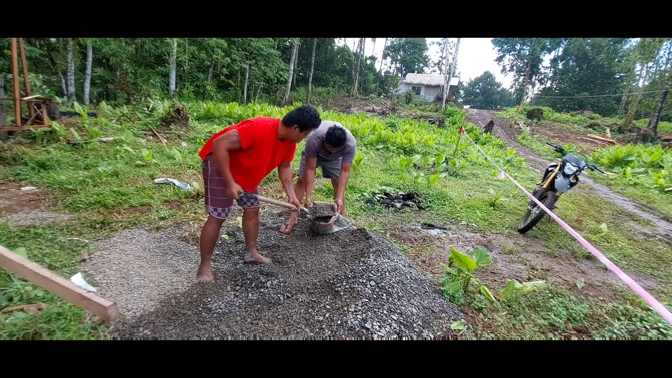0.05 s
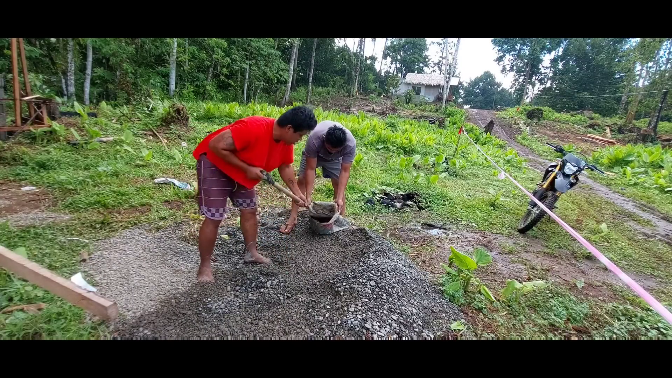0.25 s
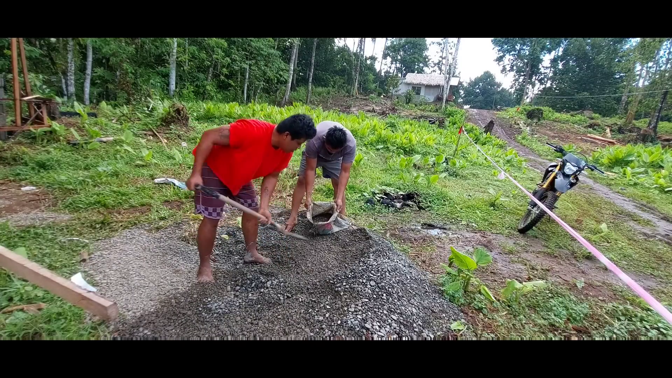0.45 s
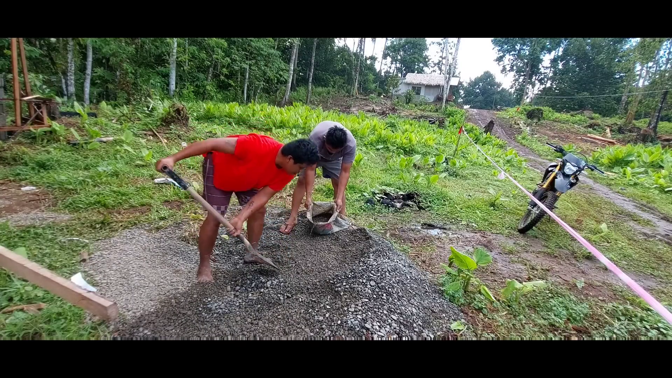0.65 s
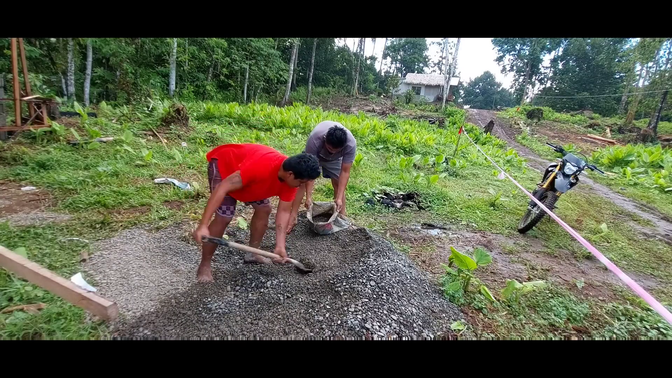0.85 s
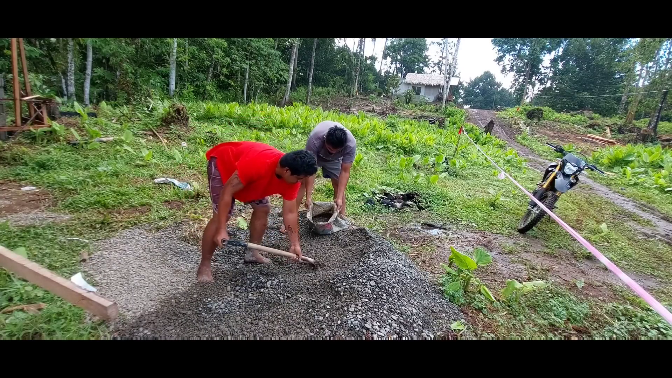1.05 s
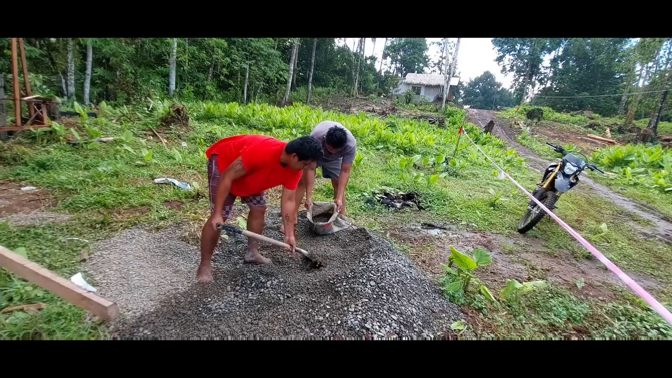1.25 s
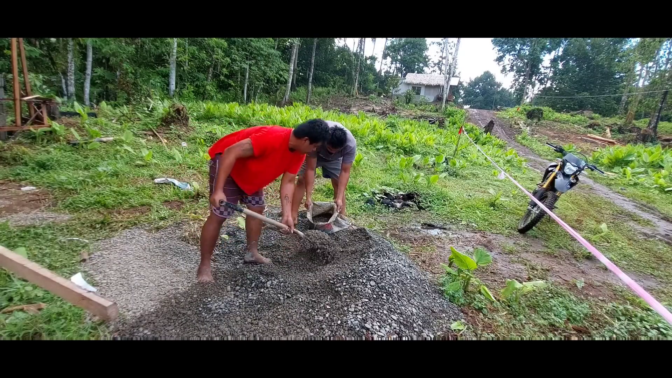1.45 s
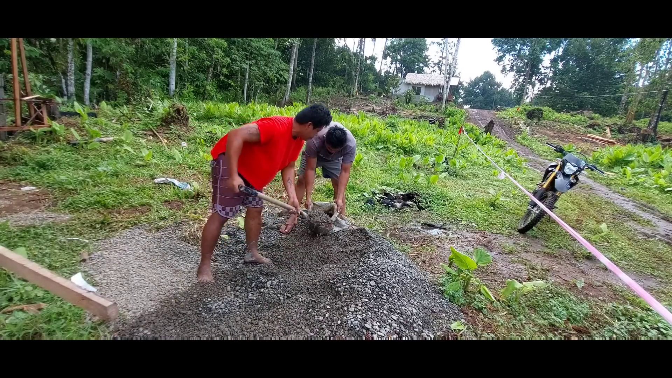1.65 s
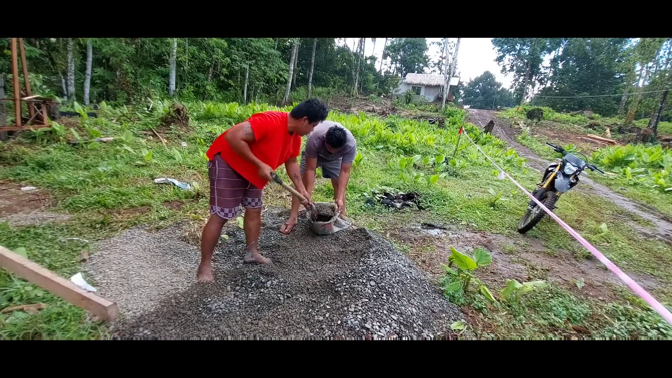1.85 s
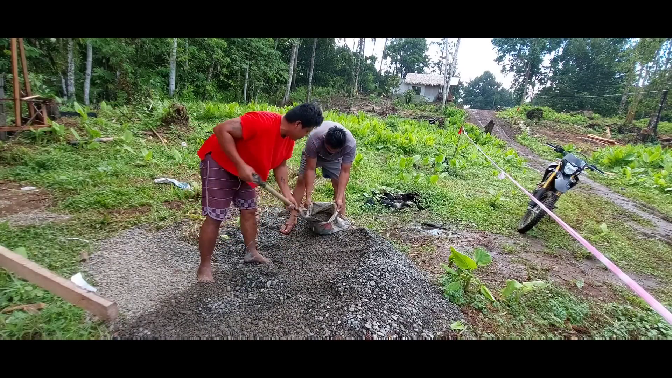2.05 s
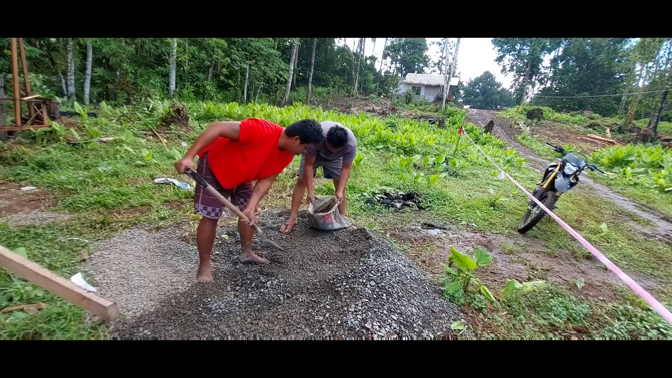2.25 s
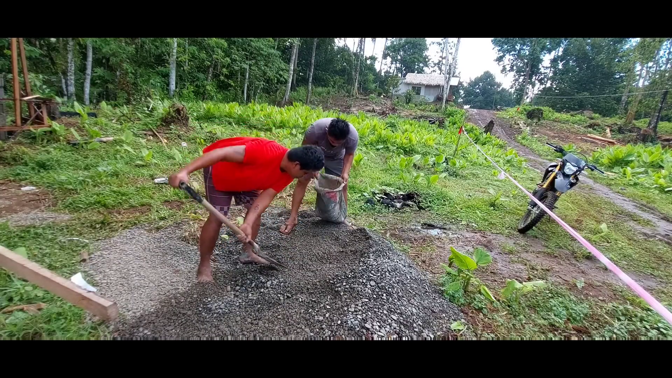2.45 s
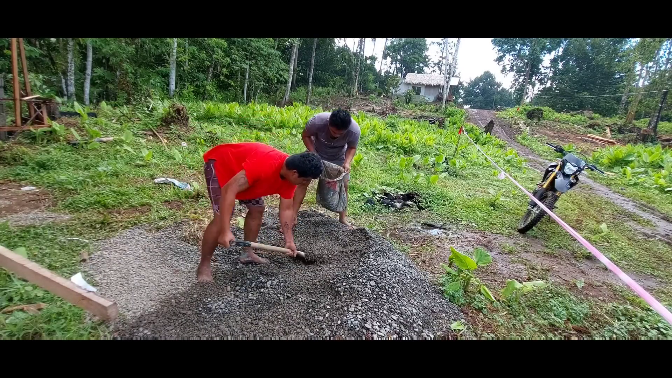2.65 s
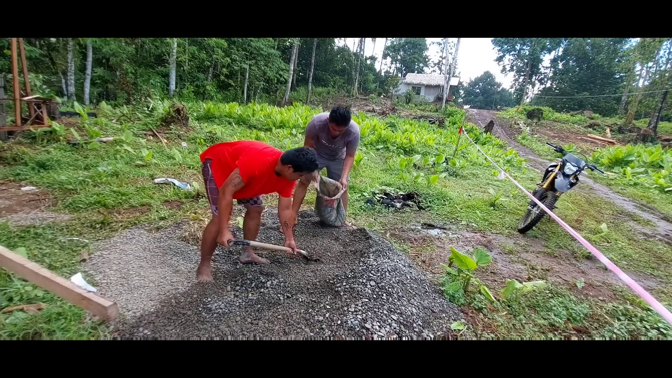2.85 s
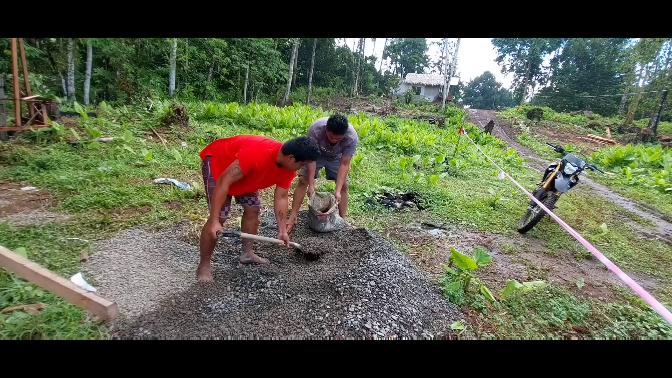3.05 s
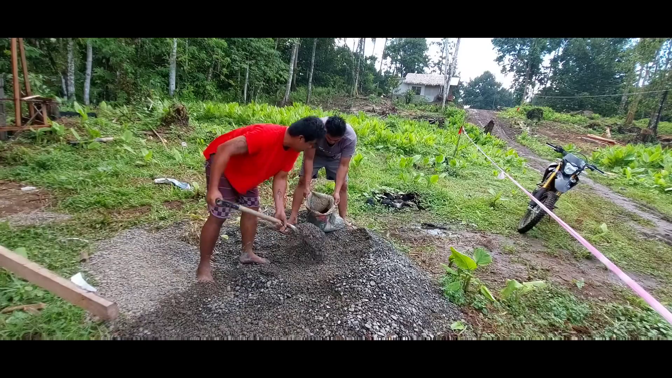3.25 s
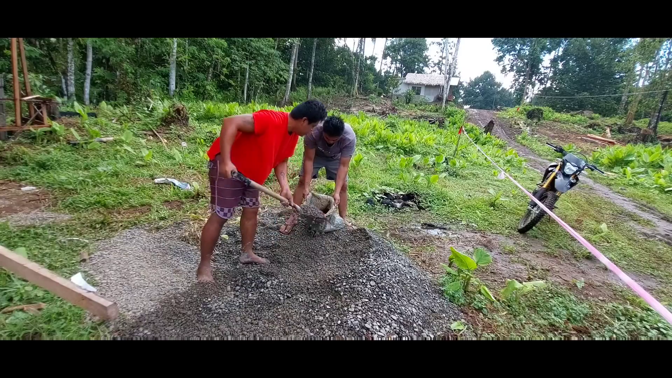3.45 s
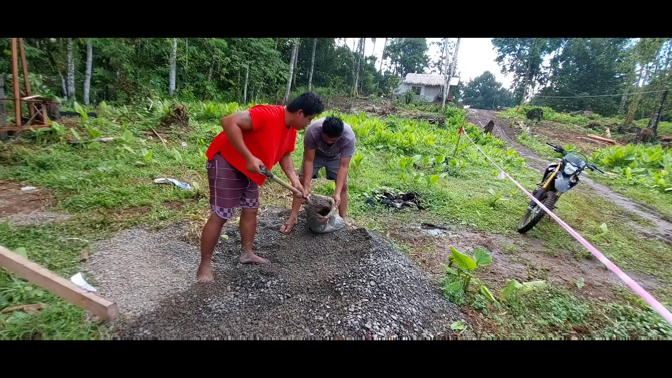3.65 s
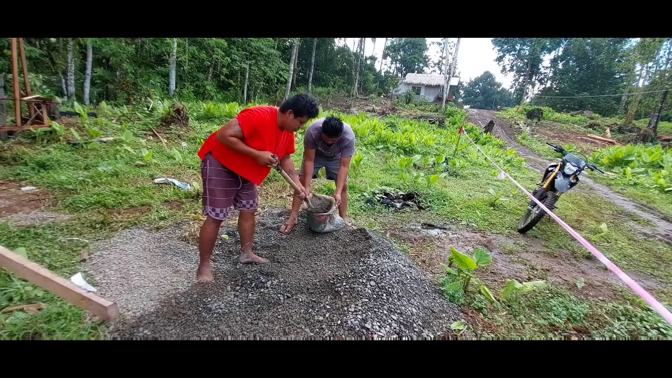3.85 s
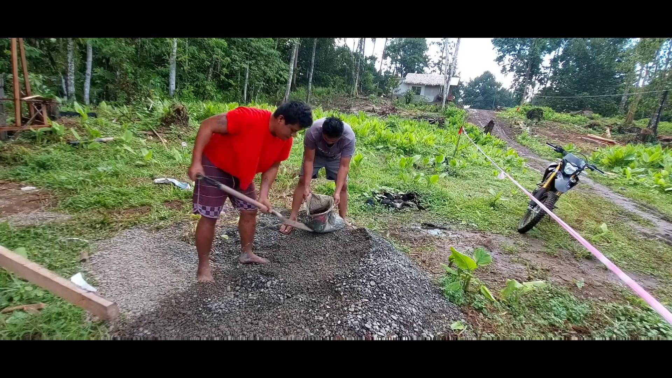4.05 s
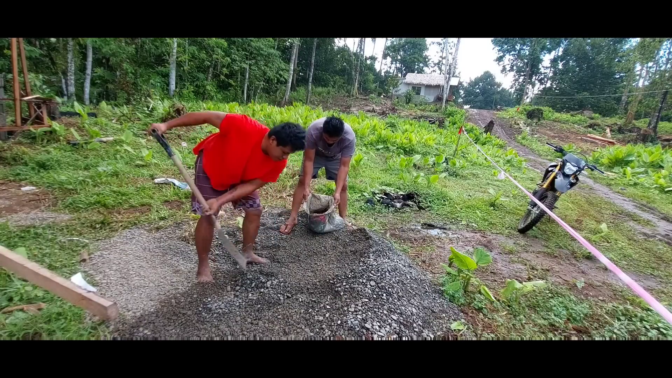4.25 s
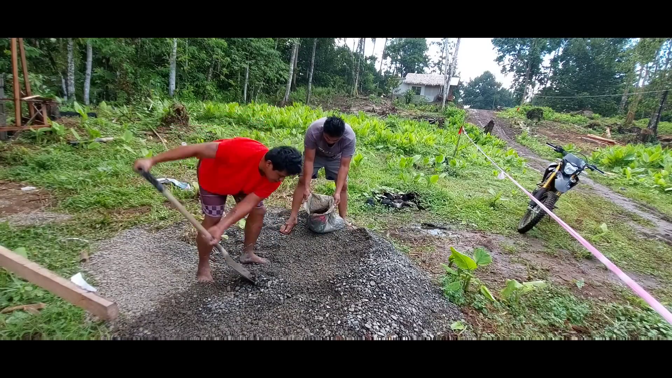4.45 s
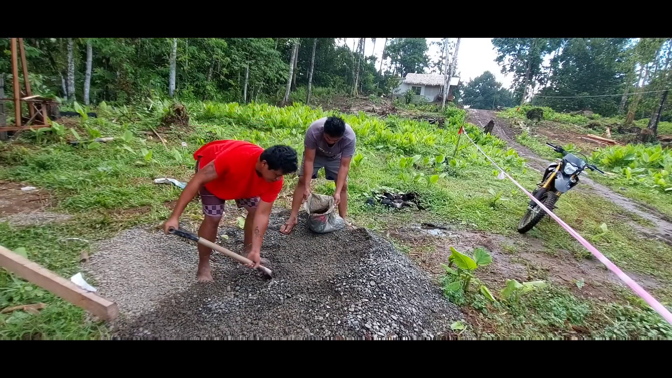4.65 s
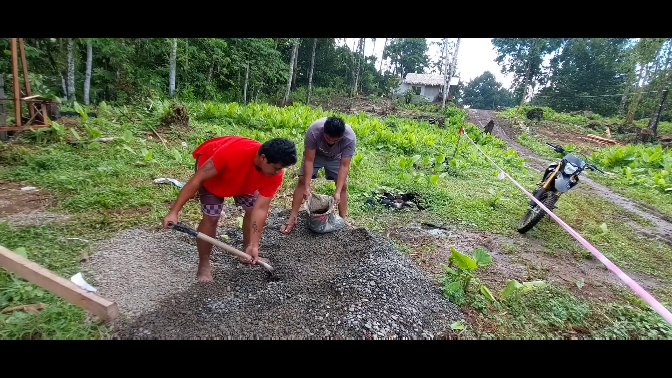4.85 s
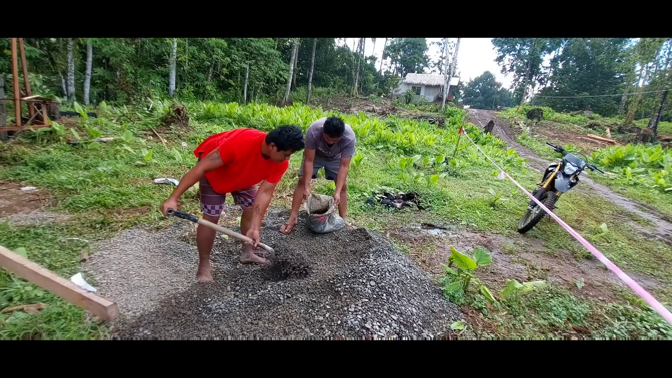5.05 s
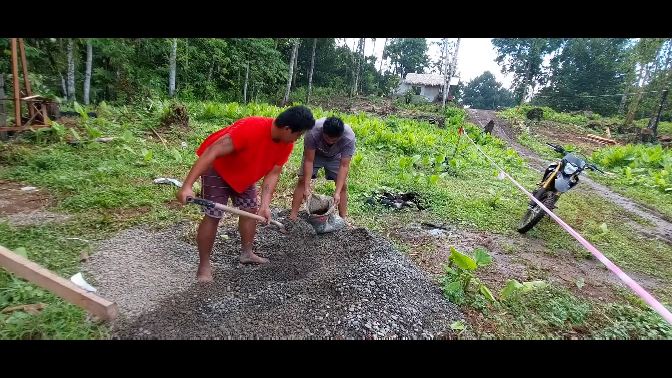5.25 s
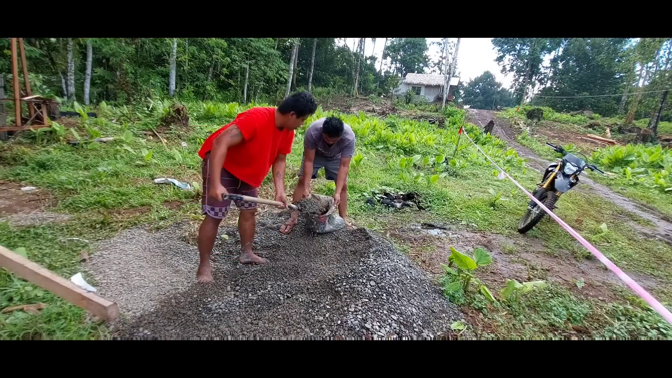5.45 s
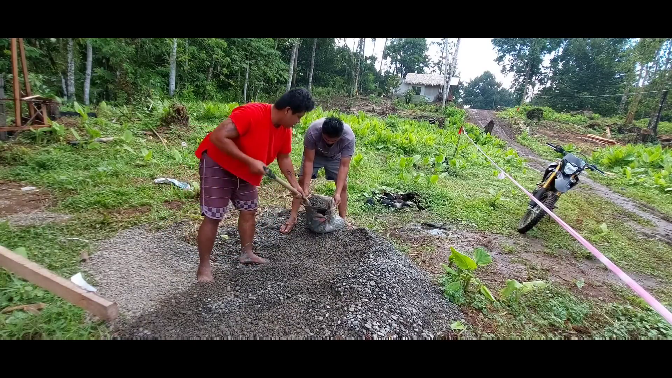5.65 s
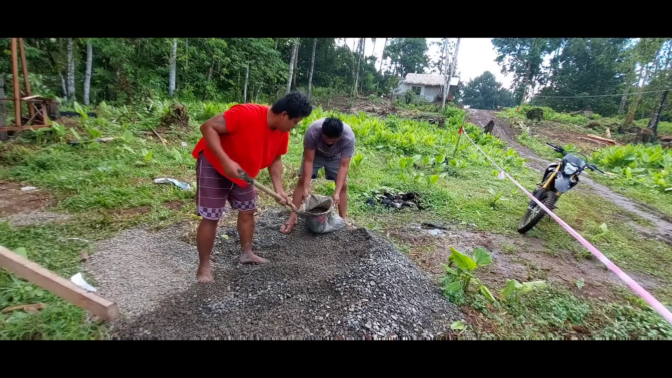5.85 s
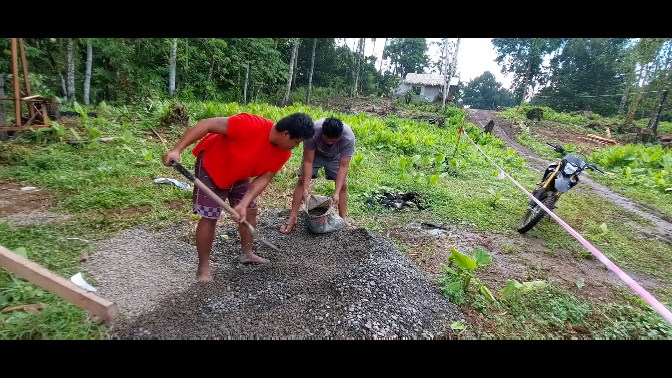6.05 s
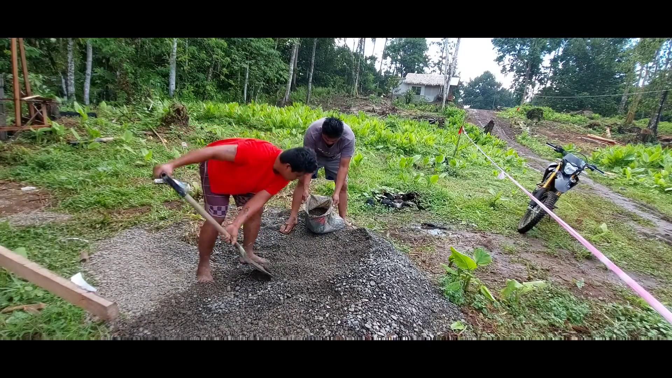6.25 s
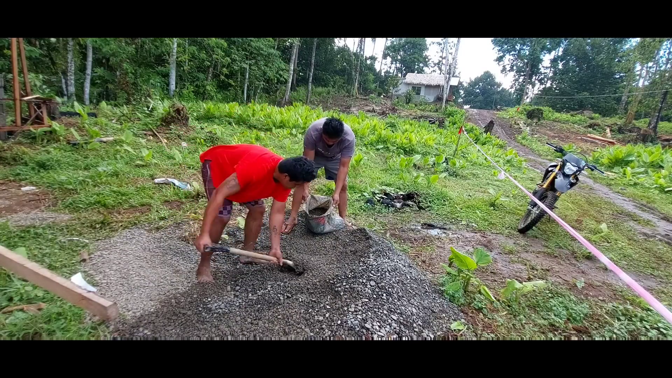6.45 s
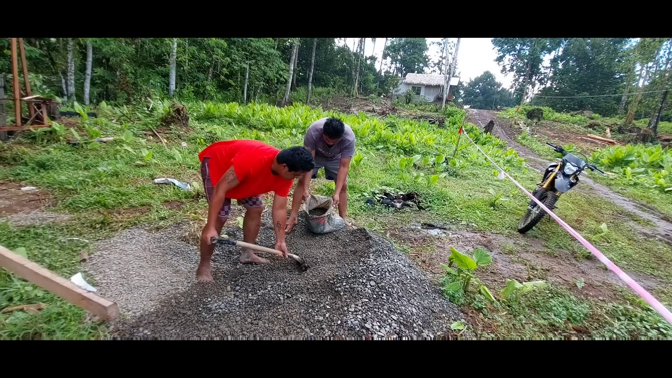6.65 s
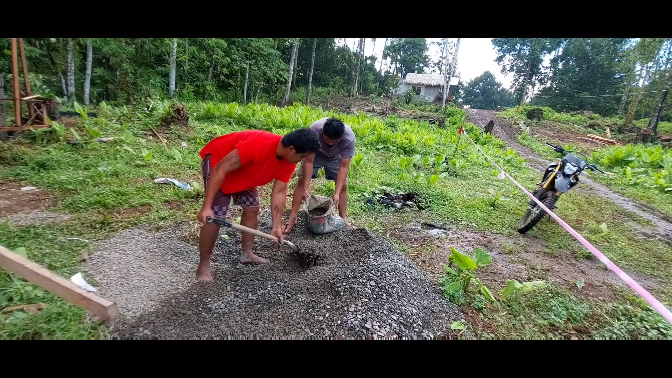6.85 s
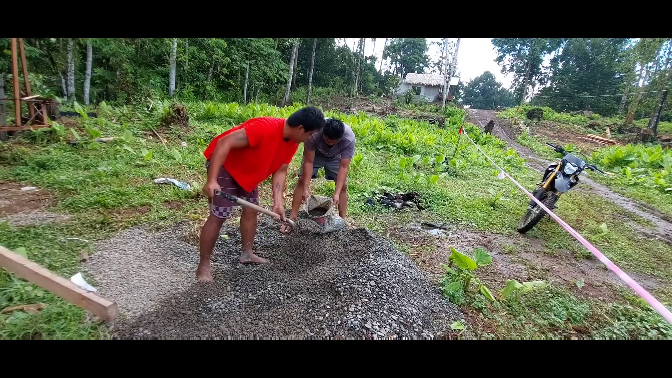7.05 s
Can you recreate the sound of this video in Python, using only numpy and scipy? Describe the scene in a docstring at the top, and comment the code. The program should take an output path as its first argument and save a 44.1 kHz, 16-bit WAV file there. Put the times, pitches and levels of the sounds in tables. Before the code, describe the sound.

A shovel works a heap of gravel, sand and cement in the foreground of an open garden. A load swishes down at about 0.3 seconds. The blade then crunches in at 0.9, 2.6, 4.5 and 6.4 seconds; these bites are the loudest sounds, and the last three carry sharp clicks of stone on steel. After each, pebbles trickle and tick quietly as the blade lifts. Further loads slide off with a softer, gritty swish at about 2, 3.9 and 5.8 seconds. Damp sand lands with a dull thud near 2.6 and 3.1 seconds, and faint hollow bumps fall between strokes. Throughout, a distant engine hums low, easing slightly, under a steady high insect hiss. Small birds give faint falling whistles at the start and scattered chirps later, with two far hoots after 6 seconds. Pebbles are still trickling at the end, around 7 seconds.

```python
"""A garden, where a shovel turns a heap of gravel, sand and cement. Four times the blade crunches in;
pebbles trickle and knock as it lifts, and loads swish down onto the heap. Damp sand lands twice with
a dull thud. All the gravel is built from tiny ringing collisions, shaped in three bands: low soil,
mid crunch and high grit. Behind the work a far engine hums, insects hiss and a few small birds call."""
import sys
import numpy as np
from scipy import signal
from scipy.fft import rfft, irfft, next_fast_len
from scipy.io import wavfile
from scipy.ndimage import map_coordinates

SR = 44100
rng = np.random.default_rng(int(sys.argv[2]) if len(sys.argv) > 2 else 0)


def unload_wav(signal):
    """Save mono or channel-first audio to the path in sys.argv[1] as 16-bit WAV at rate SR, clipped to [-1, 1]."""
    wavfile.write(
        sys.argv[1],
        SR,
        np.round(np.clip(np.atleast_2d(signal).T, -1, 1) * 32767).astype(np.int16),
    )


N = 313551

# stereo image, tight in the bass and wide in the treble: f/Hz, left-right coherence/0..1
STEREO_COHERENCE = [(100, .99), (400, .97), (700, .94), (1500, .78), (3000, .6), (6000, .55), (10000, .4),
                    (15000, .35)]
# how far the left channel leads: f/Hz, phase/rad
STEREO_LEAD = [(100, 0), (500, .03), (1300, .55), (3000, .7), (4400, 1.5), (5800, .6), (8000, 1.2),
               (12000, 1.6), (15000, 1.6)]
# balance across the spectrum: f/Hz, left over right/dB
STEREO_PAN = [(60, 7), (110, 2), (200, 0.03), (380, 1.4), (700, -0.7), (1290, 0.3), (2380, -0.2), (4400, 2),
              (8120, 0), (15000, -3.5)]

# EQ of the still garden air: f/Hz, gain/dB
AIR_EQ = [(22, -10), (49, 3.5), (75, -3.5), (125, -7), (200, -16), (500, -21), (1000, -33), (2500, -33),
          (4000, -30), (7000, -23), (9500, -36.5), (15500, -30)]
# insect choirs as peaks on the air, with one dip below them: f/Hz, width/Hz, gain/dB
INSECT_BANDS = [(3050, 340, -18), (4620, 510, 7), (5200, 770, 9), (8100, 870, 9), (11350, 1700, 21)]
# fader ride of the far engine, sinking with a few swells: t/s, relative level/dB
ENGINE_FADER = [(0.0, -47), (0.95, -46), (1.8, -51.5), (2.16, -48.5), (2.95, -52), (4.53, -53), (4.75, -49),
                (5.54, -54.5), (5.8, -54.5), (6.63, -48.5), (7.11, -57)]
# firing rate of the engine: t/s, f/Hz
ENGINE_FIRING = [(0, 62.95), (1.5, 64.06), (7.11, 63.64)]
# one small bird's falling chirps: t/s, level/dB
BIRD_CHIRPS = [(0.629, -60), (0.70, -59), (1.15, -54), (1.76, -52), (1.835, -55), (3.235, -57),
               (5.127, -54), (5.205, -55), (6.315, -55)]
# longer gliding whistles: t/s, length/s, level/dB, first f/Hz, middle f/Hz, last f/Hz
BIRD_WHISTLES = [(0.115, 0.135, -49, 5700, 4750, 3850), (0.425, 0.145, -50, 5900, 5000, 3950),
                 (6.14, 0.17, -58.5, 3750, 4600, 4550)]
# far hoots, each on one pitch: t/s, length/s, level/dB, f/Hz
BIRD_HOOTS = [(6.13, 0.1, -56.5, 560), (6.81, 0.13, -62, 680)]

# soft hollow bumps between strokes: t/s, level/dB, f/Hz
SOFT_THUMPS = [(1.485, -53.5, 274), (3.822, -50, 201), (5.426, -59, 296)]
# stones hitting steel or each other: t/s, relative level/dB, f/Hz, left over right/dB, half-width/octaves
STONE_KNOCKS = [(0.0704, -23.5, 11800, -1, 2), (0.0953, -26.5, 2780, -3, 1.05),
                (0.8593, -23.5, 4700, 1, 0.67), (1.4228, -26.5, 3680, 0.5, 0.65),
                (1.6053, -29.5, 4590, 1, 0.84), (1.6895, -30, 11600, -4, 0.89), (1.762, -25, 2900, 0, 0.7),
                (1.8437, -26.5, 14200, -5, 2.6), (2.6425, -5, 1760, 5, 2.8), (2.6758, -10, 1920, -8, 0.4),
                (3.2091, -32, 2840, 0, 1.3), (3.4905, -30, 2830, 1, 0.81), (3.4366, -29, 12600, 2, 1.7),
                (3.6027, -28.5, 12900, -1, 1.7), (3.792, -21.5, 11400, 4, 1.2),
                (3.941, -17.5, 4600, -2, 0.53), (4.569, -6, 11000, 1, 0.56), (4.7002, -9, 2030, -1, 0.46),
                (5.121, -27.5, 2570, 4, 1), (5.2674, -29, 12000, -2, 0.9), (5.359, -24, 12800, -2, 0.8),
                (5.5153, -24, 12300, -1, 1.5), (5.6197, -25, 12700, 1, 2), (6.1352, -30.5, 13800, -5, 0.55),
                (6.2767, -33, 5050, -2, 0.94), (6.3493, -32, 4810, -2, 1.8), (6.374, -19, 12140, 4, 0.26),
                (6.5488, -8, 2800, 4, 1.7)]
# the loaded blade lifts and swings: t/s, length/s, opening pebble level/dB, closing grit level/dB
LIFT_CUES = [(-0.7, 0.82, -49.3, -51.5), (1.13, 0.8, -47.8, -49.5), (2.85, 0.98, -50.6, -49.4),
             (4.84, 0.89, -49.4, -48.2), (6.72, 0.85, -52, -51)]
# EQ of trickling pebbles: f/Hz, gain/dB
TRICKLE_EQ = [(88, -36), (150, 26), (189, -3), (279, 12.5), (428, -1.5), (656, -5.5), (1150, -7),
              (2450, -0.5), (8330, -6), (12500, -1), (15500, -1)]
# damp sand drops in a lump: t/s, rise/s, pour/s, thud delay/s, crunch level/dB, thud boost/dB
DUMP_CUES = [(2.315, 0.26, 0.045, 0.26, -37, 8.5), (2.971, 0.014, 0.064, 0.088, -37, 10)]
# EQ of damp sand: f/Hz, gain/dB
DUMP_EQ = [(53, -32), (90, -2), (288, -0.5), (415, -0.5), (515, -4), (1050, -15.5), (1720, -16),
           (2280, -19), (5280, -24), (15500, -30.5)]
# a load slides off and lands: t/s, rise/s, fall/s, crunch level/dB, grit offset/dB, soil offset/dB
THROW_CUES = [(0.242, 0.13, 0.06, -36.5, -3, -9.5), (1.92, 0.16, 0.065, -38, -3.5, -10.5),
              (3.842, 0.12, 0.065, -35.5, -4.8, -12.5), (5.712, 0.15, 0.055, -35.3, -3.5, -10.5)]
# EQ of the landing load: f/Hz, gain/dB
THROW_EQ = [(59, -37), (100, 8.5), (129, -7), (438, -4), (654, -6.5), (956, 2), (1110, -1), (1620, 5),
            (2000, 2.5), (5170, 0), (8410, -13.5), (12000, -10), (15500, -16)]
# the blade drives into the heap: t/s, rise/s, push/s, brake/s, crunch level at full depth/dB,
# crunch growth on the way in/dB, grit offset at first touch/dB, soil offset/dB
DIG_CUES = [(0.874, 0.027, 0.11, 0.12, -23.5, 0.5, 3, -9),
            (2.631, 0.0084, 0.076, 0.18, -23.2, -1, 2.5, -9.5),
            (4.549, 0.0095, 0.12, 0.18, -26, 4, 3, -7.5), (6.35, 0.12, 0.058, 0.18, -22.5, -5, 7, -12.5)]
# EQ of the bite: f/Hz, gain/dB
DIG_EQ = [(47, -56), (80, -3), (181, -17), (281, -9), (366, -11), (418, -8.5), (649, -6), (741, -4.5),
          (1150, -4), (2000, 0.5), (6860, -5.5), (8550, -12.5), (11900, -5.5), (15500, -12)]
# resonances of the blade, damped by the heap: f/Hz, width/Hz, gain/dB
BLADE_MODES = [(294, 32, 2), (756, 28, 4.5), (1390, 91, 2.5), (1670, 110, 0.5), (2020, 380, 1),
               (4800, 1300, 2.5)]


def amp(db):
    """Decibels to linear gain."""
    return 10 ** (np.asarray(db) / 20)


def normalise(x):
    """Scales a stereo pair so that its mono mix has rms 1."""
    return x / np.sqrt(np.mean(x.mean(0) ** 2) + 1e-20)


def curve(points, hz):
    """Joins breakpoints with straight lines on a log-frequency axis."""
    f, value = np.transpose(points)
    return np.interp(np.log(hz + 1), np.log(f + 1), value)


def bells(modes, hz):
    """The gain in dB of a set of bell filters."""
    return sum(db / (1 + (2 * (hz - f) / width) ** 2) for f, width, db in modes)


def add(mix, s, sound):
    """Drops a sound on the timeline at s seconds, trimming any overhang."""
    at = round(s * SR)
    sound = sound[:, max(-at, 0):]
    part = mix[:, max(at, 0):][:, :sound.shape[1]]
    part += sound[:, :part.shape[1]]


def wander(n, rate):
    """Smooth random modulator, rms near 1, that moves about `rate` times a second."""
    knots = rng.standard_normal(4096)
    return map_coordinates(knots, [np.arange(n) * rate / SR], order=2, mode="wrap")


def envelope(t, onset_db, rise_s, hold_s, fall_s, fall_bend=1, rise_bend=1):
    """Attack, hold and release in dB: climbs by onset_db, holds, and is 30 dB down after fall_s."""
    attack = np.maximum(1 - t / rise_s, 0)
    release = np.maximum(t - rise_s - hold_s, 0) / fall_s
    return -onset_db * attack ** rise_bend - 30 * release ** fall_bend


def stereo(spectra, hz):
    """Blends two unrelated spectra into one image: alike in the bass, apart in the treble."""
    same = np.clip(curve(STEREO_COHERENCE, hz), 0, 1)
    right = same * spectra[0] + np.sqrt(1 - same ** 2) * spectra[1]
    lag = np.exp(-1j * curve(STEREO_LEAD, hz))
    lean = amp(curve(STEREO_PAN, hz) / 2)
    return np.array([spectra[0] * lean, right * lag / lean])


def garden(level_db=-54, coherence=0.66):
    """The bed: a low rumble of open air and the steady hiss of insects from all sides."""
    size = next_fast_len(N, True)
    hz = np.fft.rfftfreq(size, 1 / SR)
    noise = rfft(rng.standard_normal((2, size)))
    same = np.clip(curve(STEREO_COHERENCE, hz) ** 2.7 * coherence, 0, 1)
    noise[1] = same * noise[0] + np.sqrt(1 - same ** 2) * noise[1]
    air = irfft(noise * amp(curve(AIR_EQ, hz) + bells(INSECT_BANDS, hz)), size)[:, :N]
    return normalise(air) * amp(level_db + 0.5 * wander(N, 4))


def engine(trim_db=5.0, octave_db=-19, waver=0.0135, throb_db=2.5):
    """A far engine: only the firing note and its octave carry, throbbing unevenly."""
    t = np.arange(N) / SR
    hz = np.interp(t, *np.transpose(ENGINE_FIRING)) * (1 + waver * wander(N, 9.8))
    phase = 2 * np.pi * np.cumsum(hz) / SR
    hum = np.sin(phase) + amp(octave_db + 2 * wander(N, 10)) * np.sin(2 * phase)
    return hum * amp(np.interp(t, *np.transpose(ENGINE_FADER)) + trim_db + throb_db * wander(N, 14))


def birds(chirp_s=0.045, chirp_hz=(3170, 3020, 2780), waver=0.012, flutter_db=1.5, wet_db=-5, tail_s=0.06):
    """Chirps, thin whistles and two far hoots: fluttering sine tones, blurred by the trees."""
    song = np.zeros((1, N))
    chirps = [(s, chirp_s, db, *chirp_hz) for s, db in BIRD_CHIRPS]
    for s, length_s, db, *pitches in [*chirps, *BIRD_WHISTLES, *BIRD_HOOTS]:
        n = int(length_s * SR)
        progress = np.linspace(0, 1, n)
        glide = np.polyfit(np.linspace(0, 1, len(pitches)), pitches, len(pitches) - 1)
        hz = np.polyval(glide, progress) * (1 + waver * wander(n, 335))
        level = amp(db + flutter_db * wander(n, 80)) * np.sin(np.pi * progress)
        add(song, s, (level * np.sin(2 * np.pi * np.cumsum(hz) / SR))[None])
    t = np.arange(SR // 3) / SR
    trees = rng.standard_normal((2, len(t))) * np.exp(-t / tail_s)
    reverb = signal.oaconvolve(song, trees / np.linalg.norm(trees[0]), axes=1)[:, :N]
    return song + amp(wet_db) * reverb


def thumps(swell_s=0.0082):
    """Each soft bump is one low, quickly damped note."""
    out, t = np.zeros((2, N)), np.arange(SR // 8) / SR
    swell = t / swell_s * np.exp(1 - t / swell_s)
    for s, db, hz in SOFT_THUMPS:
        add(out, s, (amp(db) * swell * np.sin(2 * np.pi * hz * t))[None])
    return out


def chips(per_lift=2, relative_db=-36, spread_db=7, hz=11500, octaves=1.6, earliest=0.58):
    """Extra knock cues: small chips tick off the blade at random, late in each lift."""
    cues = []
    for s, length_s, _, _ in LIFT_CUES:
        for when, strength, side in rng.random((per_lift, 3)):
            at_s = s + length_s * (earliest + (1 - earliest) * when)
            cues.append((at_s, relative_db + spread_db * (2 * strength - 1), hz, -4 * side, octaves))
    return cues


def knocks(trim_db=9, ring_s=0.00091, rattle_db=-27, rattle_s=0.032, size=1024):
    """A stone gives one dry snap around its own pitch and a brief rattle of its neighbours."""
    out, t, hz = np.zeros((2, N)), np.arange(size) / SR, np.fft.rfftfreq(size, 1 / SR)
    decay = np.exp(-t / ring_s) + amp(rattle_db) * np.exp(-t / rattle_s)
    preroll = size // 8  # room for the filter to ring ahead of the hit
    for s, db, pitch, pan_db, octaves in [*STONE_KNOCKS, *chips()]:
        snap = rng.choice([-1., 1.], (2, size)) * decay
        body = 1 / (1 + (np.log2((hz + 1) / pitch) / octaves) ** 6)
        click = irfft(stereo(rfft(np.roll(snap, preroll, 1)), hz) * body)
        click /= np.linalg.norm(click.mean(0))
        add(out, s - preroll / SR, click * amp(db + trim_db + np.array([[pan_db], [-pan_db]]) / 2))
    return out


def grains(n, density, spread_db, cycles, bands=24):
    """Stones of many sizes collide at random and ring briefly; the small, bright ones hit most often."""
    out = np.zeros((2, n))
    for hz in np.geomspace(120, 17000, bands):
        hits_per_s = density / bands * np.sqrt(hz / 3000)
        chance = rng.random(n) / (hits_per_s / SR)
        hits, force = chance < 1, np.zeros(n)
        force[hits] = amp(spread_db * np.minimum(-np.log(chance[hits]), 4)) / hz ** 0.25
        kicks = np.where(rng.integers(0, 2, (2, n), dtype=bool), force, -force)
        turn, r = 2 * np.pi * hz / SR, np.exp(-hz / SR / cycles)  # resonator pole: angle, radius
        out += signal.lfilter([1 - r, 0, r - 1], [1, -2 * r * np.cos(turn), r * r], kicks + 1e-18)
    return out


def snaps(n, per_s, snap_db, spread_db=3, snap_s=0.00015):
    """Gain spikes: a chip of stone snaps and the whole spectrum leaps for under a millisecond."""
    hits = rng.random(n) < per_s / SR
    spikes = hits * amp(snap_db + spread_db * np.minimum(rng.exponential(1, n), 3))
    return 1 + signal.lfilter([1], [1, -np.exp(-1 / (snap_s * SR))], spikes)


def reflections(hz, strength, count=8):
    """Early echoes off blade, ground and legs comb the spectrum anew for each stroke."""
    delay_s = rng.uniform(0.000968, 0.016, (count, 1))
    sign = rng.choice([-1., 1.], (count, 1))
    return 1 + strength * (sign * np.exp(-2j * np.pi * hz * delay_s)).sum(0) / np.sqrt(count)


def gravel(strokes, eq, density, spread_db, cycles, judder_db, judder_hz, echo, snaps_per_s, snap_db,
           modes=(), soil_hz=650, grit_hz=6800, fade_s=0.0021):
    """Gravel slipping in small jerks; a stroke is a start time and dB curves for soil, crunch and grit."""
    out = np.zeros((2, N))
    for s, *levels_db in strokes:
        n = len(levels_db[0])
        size = next_fast_len(n + 2048, True)
        hz = np.fft.rfftfreq(size, 1 / SR)
        stones = grains(size, density, spread_db, cycles) * snaps(size, snaps_per_s, snap_db)
        spectrum = stereo(rfft(stones), hz) * reflections(hz, echo) * amp(curve(eq, hz) + bells(modes, hz))
        soil = 1 / (1 + (hz / soil_hz) ** 6)
        grit = 1 - 1 / (1 + (hz / grit_hz) ** 6)
        bands = zip((soil, 1 - soil - grit, grit), levels_db)
        sound = sum(normalise(irfft(spectrum * band, size))[:, :n] * amp(db) for band, db in bands)
        fade = np.minimum(np.arange(n) / SR / fade_s, 1)
        add(out, s, sound * fade * fade[::-1] * amp(judder_db * wander(n, judder_hz)))
    return out


def trickle(rise_s=0.1, roll_fade_db=10.5, spill_growth_db=18, soil_db=-17):
    """Pebbles roll back into the hole and die away as ever more grit spills off the swinging blade."""
    strokes, t = [], np.arange(0, 1.25, 1 / SR)
    for s, length_s, pebbles_db, grit_db in LIFT_CUES:
        swing = np.minimum(t / length_s, 1)
        flow = envelope(t, onset_db=9.5, rise_s=rise_s, hold_s=length_s - rise_s, fall_s=0.39)
        pebbles = flow + pebbles_db - roll_fade_db * swing
        grit = flow + grit_db - spill_growth_db * (1 - swing) ** 2
        strokes.append((s, pebbles + soil_db, pebbles, grit))
    return gravel(strokes, TRICKLE_EQ, density=9000, spread_db=2.5, cycles=0.32,
                  judder_db=2.0, judder_hz=74, echo=0, snaps_per_s=80, snap_db=5.5)


def dumps(soil_db=-3.5, grit_db=-12, thud_width_s=0.028):
    """Damp sand pours, and the bulk of it lands with one low thud."""
    strokes, t = [], np.arange(0, 0.55, 1 / SR)
    for s, rise_s, pour_s, thud_s, db, thud_db in DUMP_CUES:
        crunch = db + envelope(t, onset_db=19, rise_s=rise_s, hold_s=pour_s, fall_s=0.21, fall_bend=0.88)
        thud = thud_db * np.exp(-((t - thud_s) / thud_width_s) ** 2)
        strokes.append((s, crunch + soil_db + thud, crunch, crunch + grit_db))
    return gravel(strokes, DUMP_EQ, density=12000, spread_db=-2, cycles=1.8,
                  judder_db=0.4, judder_hz=71, echo=0.18, snaps_per_s=41, snap_db=6)


def shower(t, rise_s, fall_s, onset_db=21, steepness=0.84, straggle_s=0.4, settle_db_per_s=39):
    """The dB curve of a falling load: a rounded swell, then a tail of stragglers until the heap settles."""
    early = np.maximum(1 - t / rise_s, 0)
    late = np.maximum(t - rise_s, 0) / fall_s
    settled = settle_db_per_s * np.maximum(t - straggle_s, 0)
    return -onset_db * early ** 2 - steepness * 20 * np.log10(1 + late ** 2) - settled


def throws(grit_lag_s=0.042, grit_linger=0.91, soil_lag_s=0.088, soil_linger=1.8):
    """The load swishes down: stones first, fine grit just after, damp soil last and for longest."""
    strokes, t = [], np.arange(0, 0.7, 1 / SR)
    for s, rise_s, fall_s, db, grit_db, soil_db in THROW_CUES:
        crunch = db + shower(t, rise_s, fall_s)
        grit = db + grit_db + shower(t, rise_s + grit_lag_s, fall_s * grit_linger)
        soil = db + soil_db + shower(t, rise_s + soil_lag_s, fall_s * soil_linger)
        strokes.append((s, soil, crunch, grit))
    return gravel(strokes, THROW_EQ, density=20000, spread_db=2.5, cycles=1.4,
                  judder_db=0.7, judder_hz=90, echo=0.3, snaps_per_s=300, snap_db=-22)


def digs(onset_db=39.5, rise_bend=1.57, run_on=1.69, sink_s=0.13, surface_soil_db=-7,
         smother_db_per_s=94, buried_grit_db=-13):
    """The blade bites, pushes on and brakes; as it sinks, grit is smothered and the soil takes over."""
    strokes, t = [], np.arange(0, 0.55, 1 / SR)
    for s, rise_s, push_s, brake_s, db, growth_db, grit_db, soil_db in DIG_CUES:
        shallow = np.maximum(1 - t / (rise_s + push_s), 0)
        drive = envelope(t, onset_db, rise_s, push_s, brake_s, fall_bend=1.68, rise_bend=rise_bend)
        crunch = db - growth_db * shallow + drive
        soil = crunch + soil_db + surface_soil_db * np.maximum(1 - t / sink_s, 0)
        # loose grit runs on after the blade has stopped
        loose = envelope(t, onset_db, rise_s, push_s, brake_s * run_on, fall_bend=0.94, rise_bend=rise_bend)
        grit = db + loose + np.maximum(grit_db - smother_db_per_s * t, buried_grit_db)
        strokes.append((s, soil, crunch, grit))
    return gravel(strokes, DIG_EQ, density=14000, spread_db=0.5, cycles=1.72, modes=BLADE_MODES,
                  judder_db=0.31, judder_hz=103.5, echo=0.31, snaps_per_s=28, snap_db=-2.5)


def scene():
    """Shovel work up front, the garden behind."""
    shovelling = digs() + throws() + dumps() + trickle() + knocks() + thumps()
    return shovelling + birds() + engine() + garden()


def record(dry, cutoff_hz=15750):
    """A steep low-pass takes the very top off the mix."""
    lowpass = signal.firwin(301, cutoff_hz, window=("kaiser", 9), fs=SR)
    return signal.oaconvolve(dry, lowpass[None], "same")


dry = scene()
out = record(dry)
unload_wav(out)
```